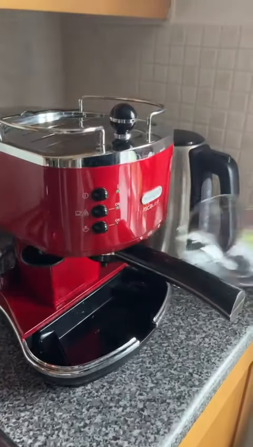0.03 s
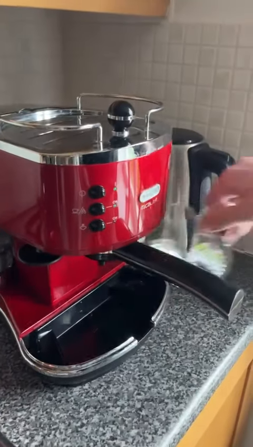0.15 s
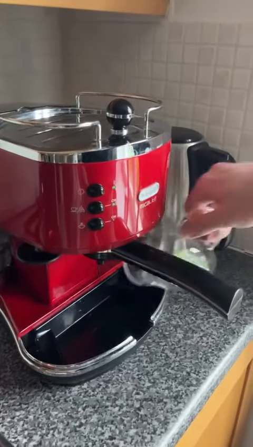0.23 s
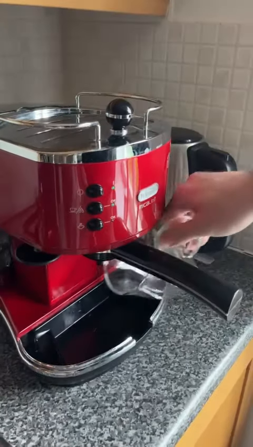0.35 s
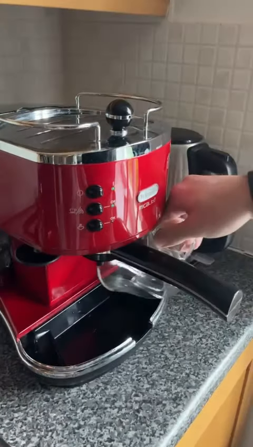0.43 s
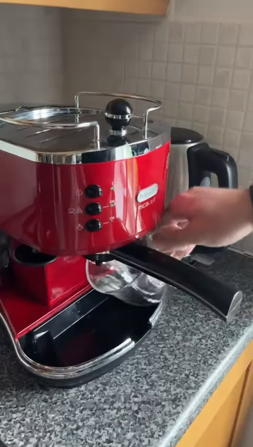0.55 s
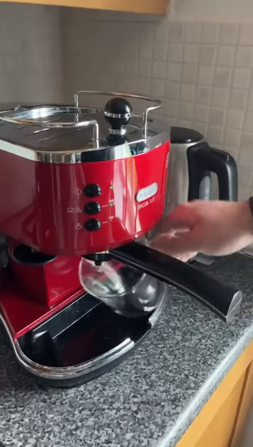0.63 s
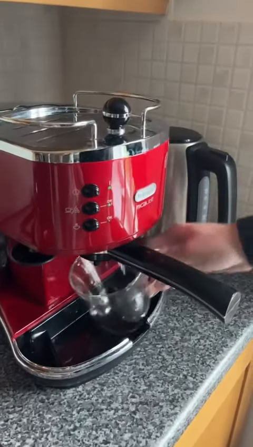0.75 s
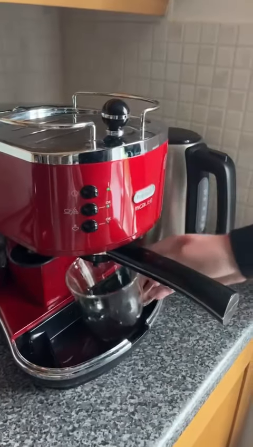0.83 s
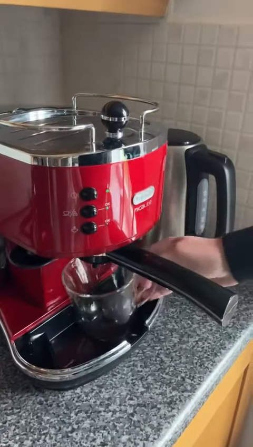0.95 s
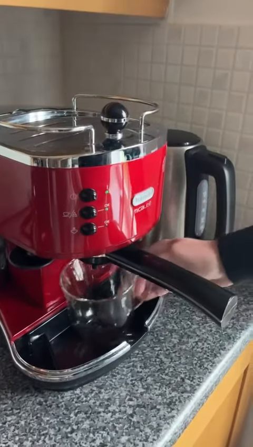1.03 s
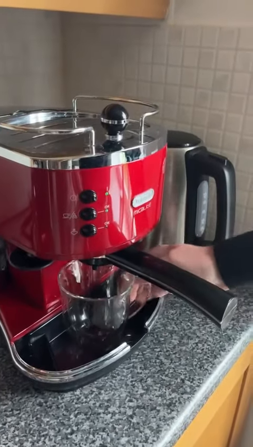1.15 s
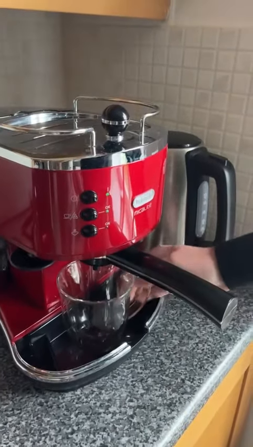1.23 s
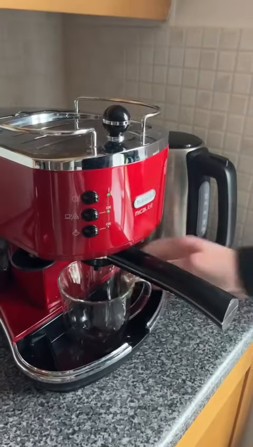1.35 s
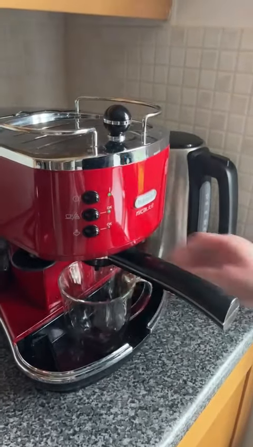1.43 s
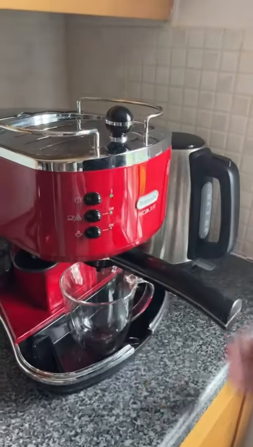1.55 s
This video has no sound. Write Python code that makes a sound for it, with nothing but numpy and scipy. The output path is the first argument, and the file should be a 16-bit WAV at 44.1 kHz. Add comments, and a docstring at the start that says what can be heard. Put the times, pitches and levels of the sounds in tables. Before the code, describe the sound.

Glass cup bumping a coffee machine's handle and casing, one bright clink, then dull taps on the tray

```python
"""Knocks, clinks and taps of a glass cup moved under a coffee machine's spout in a small tiled kitchen.
It hits the filter handle, the tray's rim, the casing and the spout, clinks, and is set down in the tray.
Each blow is a set of dying sines, a low hollow boom and a clatter of peaky noise dying band by band.
A gliding sine thrums in the worktop, shaped noise makes the quiet and the cup's rubbing as it is let go;
feedback delays give the kitchen, and two microphone ports take the blows with a phase lead and a balance."""
import sys
import numpy as np
from scipy import signal
from scipy.fft import rfft, irfft, next_fast_len
from scipy.io import wavfile
from scipy.ndimage import uniform_filter1d

SR = 44100
rng = np.random.default_rng(int(sys.argv[2]) if len(sys.argv) > 2 else 0)


def to_wav(sig):
    """Store sig (one row per channel, or 1-D mono) as 16-bit WAV at the path in sys.argv[1].

    Samples outside -1..1 are clipped; the rate is SR.
    """
    pcm = np.clip(np.atleast_2d(sig), -1, 1) * 32767
    pcm = np.round(pcm).astype(np.int16)
    wavfile.write(sys.argv[1], SR, pcm.T)  # frames by channels


def ratio_of_db(decibels):
    """Turn decibels (scalar or array-like) into linear amplitude factors; 0 dB maps to 1."""
    return 10 ** (np.asarray(decibels, float) / 20)


N = 70560   # samples, 1.6 s

# Room tone: spectrum (f/Hz, relative level per Hz/dB), and how alike left and right are (f/Hz, likeness -1..1)
QUIET = [(15, -31), (25, 5.5), (74, -5), (106, -4), (169, -9.5), (208, -2.5), (367, -21.5), (541, -12.5),
         (1410, -32), (2750, -37.5), (3050, -30.5), (3300, -39), (4380, -30.5), (6620, -59.5), (7540, -40),
         (10500, -40), (12000, -65), (15600, -84), (22000, -120)]
QUIET_LIKENESS = [(60, 0.98), (170, 1), (490, 0.45), (1420, -0.27), (4080, -0.25), (11700, 0.85)]
QUIET_DB = -51   # rms of the left-right mean
# Low thrum of the worktop: (t/s, rms level/dB, f/Hz)
THRUM = [(0.0, -71, 81), (0.056, -67, 73.4), (0.114, -68, 73.6), (0.19, -101, 81.4), (0.254, -47.5, 74.3),
         (0.328, -59, 80.8), (0.368, -39.5, 78.8), (0.44, -34, 73), (0.582, -44, 73.4), (0.73, -56, 90.2),
         (0.806, -55, 86.6), (0.882, -45.5, 80.8), (0.966, -49.5, 71), (1.038, -34.5, 73),
         (1.242, -44.5, 75.2), (1.282, -67, 74.8), (1.35, -47, 74.2), (1.474, -76.5, 76.5),
         (1.536, -83, 76.9), (1.6, -64, 80.3)]

# Blows: (t/s, level/dB, boom level/dB, tilt/dB per octave about 1 kHz, left over right/dB);
# each thing's own offsets and the ports come on top
HANDLE_KNOCKS = [(0.182, -13, -28.5, 2.5, -0.4)]
RIM_KNOCKS = [(0.341, -16, -19.5, 0.017, 0.087)]
CASING_BUMPS = [(0.392, -2, -18.5, 0.011, 0.13)]
SPOUT_TICKS = [(0.515, -17.5, -46.5, 0.0082, 0.1)]
GLASS_CLINKS = [(0.636, -3.5, -17, 0.0081, 0.1)]
TRAY_TAPS = [(0.836, -16.5, -23.5, -0.76, 0.12), (0.967, -10.5, -41, -0.35, 0.1),
             (0.996, -16, -25.5, -0.89, 0.1), (1.115, -21.5, -63, -2, 0.1),
             (1.235, -33.5, -50.5, -1.75, 0.1)]
TRAY_NUDGES = [(1.208, -36.5, -52, -5.5, 0.13)]
# Ringing modes of each thing, of the hollow machine and of the space under the tray: (f/Hz, level/dB, t60/s)
HANDLE_MODES = [(338.4, 3.5, 0.14), (387, -9, 0.29), (651, -5.5, 0.059), (719, -8, 0.09),
                (1162, -16, 0.062), (1960, -32.5, .12), (3500, -35, .14), (4770, -45, .08)]
RIM_MODES = [(259, 0.5, 0.6), (344.6, -2.5, 0.46), (460, -19, 0.077), (838, 1, 0.067), (1620, -5, 0.15),
             (1850, -27.5, .09), (3820, -3.5, 0.045), (5300, -15, .15)]
CASING_MODES = [(549, -9, 0.27), (616, 10, 0.058), (722, 2.5, 0.081), (862, -6.5, 0.3), (1267, -16, 0.089),
                (1335, -3.5, 0.16), (1743, -14.5, 0.22), (3120, -3, 0.039), (3935, -4, 0.039),
                (5030, -10.5, 0.093), (5512, -7, 0.14), (7570, -17, .13)]
SPOUT_MODES = [(640, -5.5, 0.069), (1510, 3.5, 0.032), (2299, -17, 0.033), (2813, 2.5, 0.018),
               (4070, -12, 0.04), (5300, -11.5, 0.047)]
GLASS_MODES = [(178, -15, .3), (348, -9, .12), (608, -13, .22), (739, -7, .3), (765, 6, .065),
               (846, -7, .16), (930, 3, .05), (1030, 4, .05), (1180, 2, .06), (1310, -5, .07),
               (2077, -4, .3), (2939, -16, .09), (3477, -12, .31), (3865, -16, .11), (3990, -14, .07),
               (4247, -17, .09), (4648, -9, .09), (4754, -12, .11), (5173, -21, .08), (7450, -23, .19),
               (7827, -25, .23), (8393, -33, .26), (9200, -31, .18), (9572, -29, .18), (11120, -24, .06)]
TRAY_MODES = [(616, 2, 0.069), (733, -17, 0.098), (897.6, -1.5, 0.064), (1343, -0.5, 0.047),
              (1528, -12.5, 0.23), (2056, -4.5, 0.05), (3020, -9, 0.043), (3530, -3.5, 0.027),
              (5170, -11.5, 0.091)]
HOLLOW_MODES = [(107.8, -4.5, 0.23), (156.7, 1, 0.19), (249.5, -15, 0.04), (349.7, -1, 0.24)]
UNDER_TRAY_MODES = [(165, 0, .12), (395, -18, .25)]
# Dense clatter of each thing, too many modes to tell apart: (f/Hz, relative level/dB)
HANDLE_CLATTER = [(120, -45), (200, -4.5), (377, -5.5), (1040, -25), (1620, -24.5), (2570, -35.5),
                  (5650, -45.5), (6820, -54.5), (8520, -27.5), (12000, -62.5), (15600, -92), (22000, -120)]
RIM_CLATTER = [(120, -41), (200, 2.5), (559, -8.5), (1020, -21), (1620, -20), (2400, -26.5), (5650, -30.5),
               (6260, -54.5), (8370, -27.5), (12000, -81), (15600, -93), (22000, -120)]
CASING_CLATTER = [(120, 5.5), (200, -5.5), (404, -25), (652, -3.5), (1040, -14), (4600, -26), (5010, -22.5),
                  (8520, -32.5), (10600, -30.5), (12000, -62), (15600, -93), (22000, -120)]
SPOUT_CLATTER = [(120, -38), (200, -14.5), (1190, -13.5), (1560, -6), (2520, -27.5), (2850, -10),
                 (3100, -17), (10600, -34.5), (12000, -86), (15600, -108), (22000, -120)]
GLASS_CLATTER = [(120, -32), (200, -6.5), (815, -16), (1700, -17.5), (2090, -39), (2660, -18), (4760, -23),
                 (5550, -53), (7690, -23), (12000, -31.5), (15600, -71), (22000, -120)]
TRAY_CLATTER = [(120, 3), (200, -5), (307, -28), (620, -3.5), (1110, -13.5), (1290, -13.5), (2130, -7.5),
                (6050, -25.5), (8520, -31.5), (12000, -101), (15600, -81), (22000, -120)]
# Common decay of the clatter, stretched by each thing's "lasting": (f/Hz, t60/s)
CLATTER_T60 = [(200, 0.22), (600, 0.23), (2000, 0.16), (5000, 0.1), (11000, 0.059)]
CLATTER_EDGES_HZ = 140 * 2 ** np.arange(0, 6.6, .5)   # half-octave bands
# Sudden drop of the ring: (t/s, level/dB)
HANDLE_DROP, RIM_DROP, GLASS_DROP = (.243, -9), (.384, -14), (.831, -30)
SWELL_CYCLES = 2.5   # time constant of a mode's swell, in its own cycles
CLATTER_PEAKS_DB = 5.0   # spread of the narrow peaks
CRACK_T60_S, RISE_S, RISE_CYCLES = 0.023, .0008, 1.51   # the clatter's rise is seconds plus cycles of its band

# The cup shifts as the hand lets go: course (t/s, relative level/dB) and colour (f/Hz, relative level/dB)
RUSTLE = [(1.0, -36), (1.088, -47), (1.266, -60.5), (1.56, -64)]
RUSTLE_COLOUR = [(180, -41), (300, -5), (376, 2.5), (471, -8), (1890, -17), (2500, -28), (5430, -38.5),
                 (6000, -48), (7800, -80), (13200, -120)]
RUSTLE_DB = -2   # added to the course

# Microphone ports: left's lead over right (f/Hz, phase/rad) and left over right (f/Hz, level/dB)
PORT_LEAD = [(20, 0), (300, 0.22), (800, 0.36), (2150, 0.91), (3450, 1), (4500, 1.5), (5300, 3.5),
             (6300, 3), (7200, 4.5), (8000, 7.5), (12000, 6.5)]
PORT_BALANCE = [(60, 5), (200, -1.7), (400, 2), (700, 5.5), (1200, 0.5), (2500, 2), (5000, -5.5), (9000, 2)]
# What differs between the ports in clatter, and after widening in echo: (f/Hz, share)
WIDTH = [(100, 0.029), (250, 0.067), (600, 0.39), (2000, 0.43), (5000, 0.13), (9000, 0.092)]
# Echo of the tiled kitchen: decay (f/Hz, t60/s) and strength (f/Hz, level/dB)
KITCHEN_T60 = [(100, 0.96), (500, 0.45), (2000, 0.4), (6000, 0.24), (12000, 0.19)]
KITCHEN_LEVEL = [(100, -21), (500, -12.5), (2000, -16.5), (6000, -10.5), (12000, -14)]
RING_IN_KITCHEN_DB, ECHO_WIDER = -1, 2.2   # ring sent to the echo; factor on WIDTH

# Limiter: threshold, share of the excess taken off, look-ahead, fall of the held excess
LIMIT_DB, LIMIT_SHARE, AHEAD_S, EXCESS_FALL_DB_PER_S = -19.5, 0.27, 0.0027, 33
LOW_CUT_HZ, HIGH_STOP_HZ = 38, 12350
LEFT_RIGHT = np.array([[1], [-1]])   # signs of a side signal


def at_hz(points, hz):
    """Reads a table on a log-frequency axis."""
    table = np.array(points)
    return np.interp(np.log(hz), np.log(table[:, 0]), table[:, 1])


def bins_hz(size):
    """Frequencies of a spectrum, the lowest held at 1 Hz for the logarithm."""
    return np.maximum(np.fft.rfftfreq(size, 1 / SR), 1)


def quiet():
    """Stereo room tone: shaped steady noise, mid and side weighed by the likeness of the ports."""
    hz = bins_hz(N)
    mid, side = rfft(rng.standard_normal((2, N))) * ratio_of_db(at_hz(QUIET, hz))
    alike = np.clip(at_hz(QUIET_LIKENESS, hz), -1, 1)
    tone = irfft(np.sqrt(1 + alike) * mid + np.sqrt(1 - alike) * side * LEFT_RIGHT, N)
    return ratio_of_db(QUIET_DB) * tone / tone.mean(axis=0).std()


def thrum():
    """The worktop's low thrum: a single sine that wanders in level and pitch."""
    s, db, hz = np.transpose(THRUM)
    t = np.arange(N) / SR
    cycles = np.cumsum(np.interp(t, s, hz)) / SR
    return np.sqrt(2) * ratio_of_db(np.interp(t, s, db)) * np.sin(2 * np.pi * cycles)


def ring(modes, t, tilt_db):
    """Sum of dying sines; each takes a few of its own cycles to swell, so the low ones come late."""
    hz, db, t60 = np.transpose(modes)[:, :, None]
    scatter_db = rng.normal(0, 1.2, hz.shape)
    turn = rng.random(hz.shape)
    dying = ratio_of_db(db + scatter_db + tilt_db * np.log2(hz / 1000) - 60 * t / t60)
    swell = 1 - np.exp(-t * hz / SWELL_CYCLES)
    return (dying * swell * np.sin(2 * np.pi * (hz * t + turn))).sum(axis=0)


def band(x, low, high):
    """Band-pass between two frequencies in Hz."""
    return signal.sosfilt(signal.butter(2, [low, high], "band", fs=SR, output="sos"), x)


def peaky_noise(size):
    """Noise with random narrow spectral peaks, as crowded modes give: two draws of mid and side."""
    spectrum = rfft(rng.standard_normal((2, 2, size)))
    peak_db = rng.normal(0, CLATTER_PEAKS_DB, (2, 1, size // 24 + 1))
    peaks = ratio_of_db(peak_db).repeat(16, axis=2)   # each peak is 16 bins wide
    noise = irfft(spectrum * peaks[..., :spectrum.shape[2]], size)
    return noise / noise.std()


def clatter_noise(clatter, t, tilt_db, crack_db, lasting):
    """Crowded modes as noise that dies band by band, with a short crack at its head."""
    noise, white = 0, peaky_noise(len(t))
    for k, (low, high) in enumerate(zip(CLATTER_EDGES_HZ, CLATTER_EDGES_HZ[1:])):
        hz = np.sqrt(low * high)
        tail = ratio_of_db(-60 * t / (lasting * at_hz(CLATTER_T60, hz)))
        crack = ratio_of_db(crack_db - 60 * t / CRACK_T60_S)
        rise = np.minimum(t / (RISE_S + RISE_CYCLES / hz), 1)
        # neighbouring bands take different draws
        mid, side = band(white[k % 2] * (tail + crack) * rise, low, high)
        level = ratio_of_db(at_hz(clatter, hz) + tilt_db * np.log2(hz / 1000))
        noise = noise + level * (mid + at_hz(WIDTH, hz) * side * LEFT_RIGHT)
    return noise


def blows(events, modes, hollow, clatter, ring_db, clatter_db, crack_db, boom_db, lasting, drop=(9, 0)):
    """Each blow rings the thing's modes, booms in a hollow and spills a clatter; gives rings, noises."""
    out = np.zeros((2, 2, N + SR))
    t = np.arange(SR // 2) / SR
    for s, db, low_db, tilt_db, pan_db in events:
        rings = ratio_of_db(db + ring_db) * ring(modes, t, tilt_db)
        boom = ratio_of_db(low_db + boom_db) * ring(hollow, t, 0)
        dropped = np.clip((s + t - drop[0]) / 0.0021, 0, 1)   # the drop in level takes 2.1 ms
        rings = (rings + boom) * ratio_of_db(drop[1] * dropped)
        noise = ratio_of_db(db + clatter_db) * clatter_noise(clatter, t, tilt_db, crack_db, lasting)
        i = int(s * SR)
        pan = ratio_of_db(pan_db / 2 * LEFT_RIGHT)
        out[:, :, i:i + len(t)] += [rings * pan, noise * pan]
    return out[:, :, :N]


def handle_knocks():
    """The filter handle rings low over the machine's boom, then drops suddenly in level."""
    return blows(HANDLE_KNOCKS, HANDLE_MODES, HOLLOW_MODES, HANDLE_CLATTER, ring_db=-0.5, clatter_db=16,
                 crack_db=-3, boom_db=2.5, lasting=1.07, drop=HANDLE_DROP)


def rim_knocks():
    """The tray's rim rings with low modes over the machine's boom, turned down just before the next bump."""
    return blows(RIM_KNOCKS, RIM_MODES, HOLLOW_MODES, RIM_CLATTER, ring_db=-12.0, clatter_db=16.0,
                 crack_db=5.0, boom_db=-3, lasting=1.12, drop=RIM_DROP)


def casing_bumps():
    """The casing rings from mid to treble over the machine's boom, with a short clatter."""
    return blows(CASING_BUMPS, CASING_MODES, HOLLOW_MODES, CASING_CLATTER, ring_db=-14, clatter_db=14.5,
                 crack_db=0, boom_db=0.5, lasting=0.61)


def spout_ticks():
    """The spout ticks: a few modes that die within hundredths of a second, and a crack."""
    return blows(SPOUT_TICKS, SPOUT_MODES, HOLLOW_MODES, SPOUT_CLATTER, ring_db=-2, clatter_db=9.5,
                 crack_db=4, boom_db=-8.5, lasting=0.86)


def glass_clinks():
    """The glass clinks with many modes up to the high treble until a second touch damps them."""
    return blows(GLASS_CLINKS, GLASS_MODES, HOLLOW_MODES, GLASS_CLATTER, ring_db=-8.0, clatter_db=15,
                 crack_db=-8.5, boom_db=-3, lasting=1.0, drop=GLASS_DROP)


def tray_taps():
    """The cup taps the plastic tray: dull modes over a boom from the space beneath."""
    return blows(TRAY_TAPS, TRAY_MODES, UNDER_TRAY_MODES, TRAY_CLATTER, ring_db=-6, clatter_db=9.5,
                 crack_db=2.5, boom_db=8.0, lasting=0.79)


def rustle():
    """Soft rubbing: shaped noise in grains of 100 samples and uneven strength."""
    s, db = np.transpose(RUSTLE)
    grain_db = 2.0 * rng.exponential(1, N // 100 + 1).repeat(100)[:N]
    grains = rng.standard_normal(N) * ratio_of_db(grain_db)
    rub = irfft(rfft(grains) * ratio_of_db(at_hz(RUSTLE_COLOUR, bins_hz(N))), N)
    course_db = np.interp(np.arange(N) / SR, s, db, left=-120, right=-120)
    return ratio_of_db(RUSTLE_DB + course_db) * rub / rub.std()


def tray_nudges():
    """A faint nudge of the tray, with hardly any crack or boom."""
    return blows(TRAY_NUDGES, TRAY_MODES, UNDER_TRAY_MODES, TRAY_CLATTER, ring_db=-3, clatter_db=7,
                 crack_db=-21, boom_db=-11, lasting=1.1)


def kitchen(hz):
    """Echo response of the tiles: twelve feedback delays shared and twelve more for each side."""
    t60 = at_hz(KITCHEN_T60, hz)
    halls = np.zeros((3, len(hz)), complex)   # left, right, shared
    for k, lag in enumerate(rng.uniform(.006, .04, 36)):   # s
        loop = ratio_of_db(-60 * lag / t60) * np.exp(-2j * np.pi * hz * lag)
        halls[k % 3] += (-1) ** (k // 3) * loop / (1 - loop) / np.sqrt(12)
    alike = 1 - np.clip(ECHO_WIDER * at_hz(WIDTH, hz), 0, 1) ** 2
    return ratio_of_db(at_hz(KITCHEN_LEVEL, hz)) * (np.sqrt(alike) * halls[2] + np.sqrt(1 - alike) * halls[:2])


def at_the_ports(rings, noises):
    """Direct sound and kitchen echo reach two microphone ports, which differ in phase and level."""
    size = next_fast_len(N + SR)
    hz = bins_hz(size)
    direct = rfft(rings + noises, size)
    sent = rfft((ratio_of_db(RING_IN_KITCHEN_DB) * rings + noises).mean(axis=0), size)
    # half of the difference goes to each port
    half = ratio_of_db(at_hz(PORT_BALANCE, hz) / 2) * np.exp(.5j * at_hz(PORT_LEAD, hz))
    return irfft((direct + kitchen(hz) * sent) * [half, 1 / half], size)[:, :N]


def scene():
    """The cup's path under the machine, heard in the kitchen."""
    rings, noises = (handle_knocks() + rim_knocks() + casing_bumps() + spout_ticks()
                     + glass_clinks() + tray_taps() + tray_nudges())
    return at_the_ports(rings, noises + rustle()) + thrum() + quiet()


def band_limit(x):
    """A steep low-pass at the top of the band."""
    return signal.sosfilt(signal.butter(12, 12320, fs=SR, output="sos"), x)


def record(dry):
    """A limiter that looks ahead turns loud blows down and recovers; then both ends are cut."""
    slope = EXCESS_FALL_DB_PER_S * np.arange(N) / SR
    peak_db = 20 * np.log10(np.abs(dry).max(axis=0) + 1e-9)
    over = np.maximum(peak_db - LIMIT_DB, 0)
    held = np.maximum.accumulate(over + slope) - slope   # jumps up at once, falls steadily
    ahead = int(AHEAD_S * SR)
    held = np.append(held[ahead:], np.full(ahead, held[-1]))
    held = uniform_filter1d(held, size=89)
    limited = dry * ratio_of_db(-LIMIT_SHARE * held)
    high_cut = signal.cheby2(10, 50, HIGH_STOP_HZ, fs=SR, output="sos")   # 50 dB down from there up
    low_cut = signal.butter(4, LOW_CUT_HZ, "high", fs=SR, output="sos")
    mix = signal.sosfilt(low_cut, signal.sosfilt(high_cut, limited))
    return band_limit(mix)


dry = scene()
out = record(dry)
to_wav(out)
```